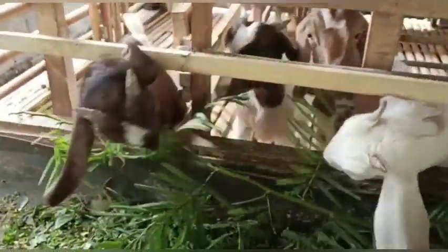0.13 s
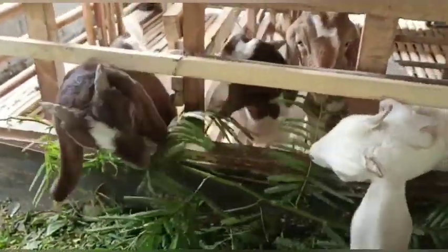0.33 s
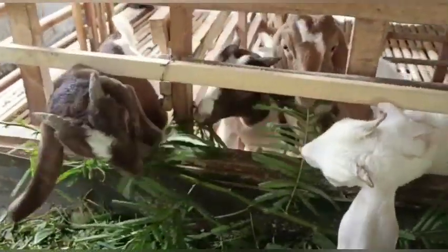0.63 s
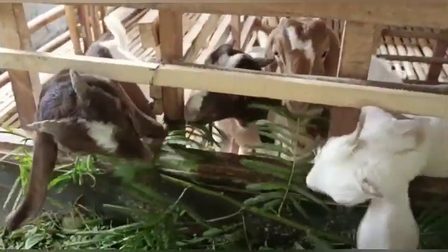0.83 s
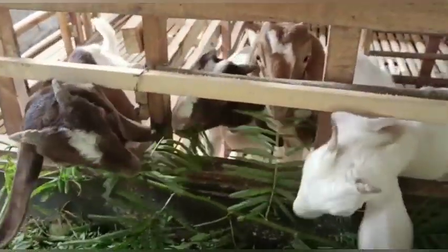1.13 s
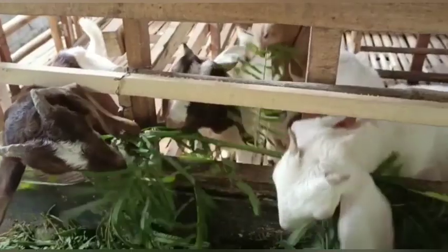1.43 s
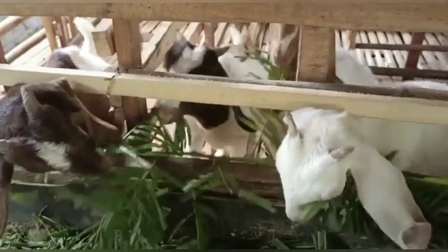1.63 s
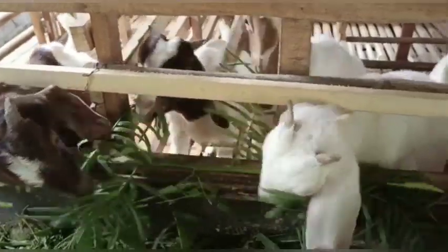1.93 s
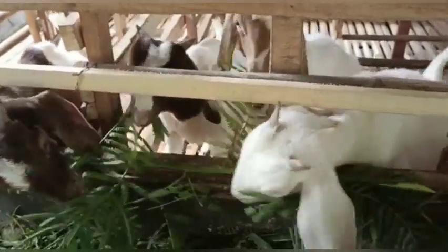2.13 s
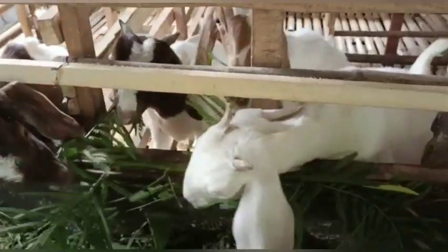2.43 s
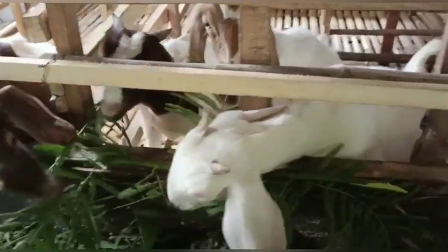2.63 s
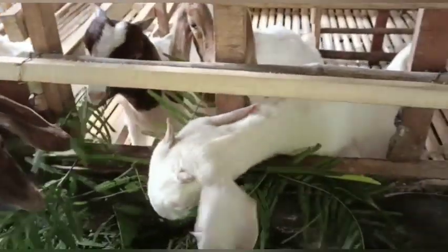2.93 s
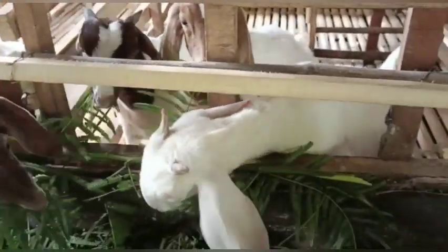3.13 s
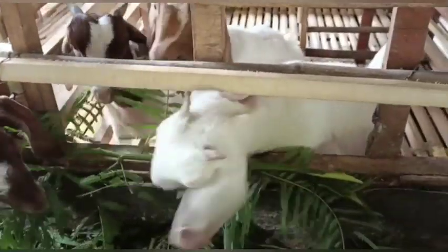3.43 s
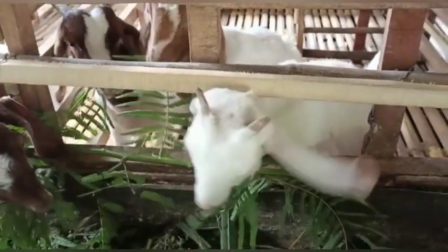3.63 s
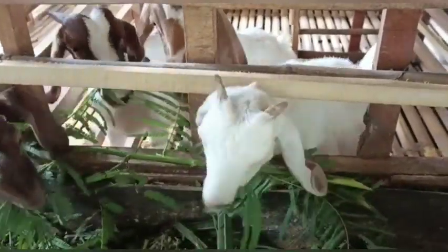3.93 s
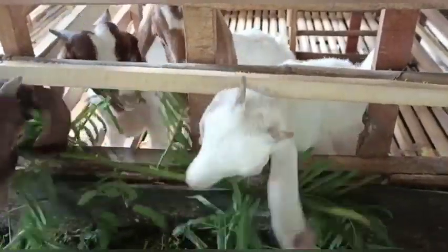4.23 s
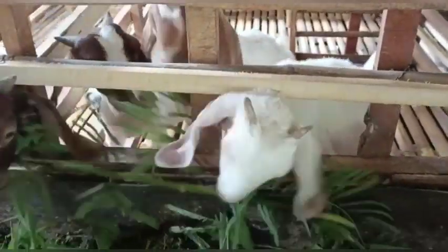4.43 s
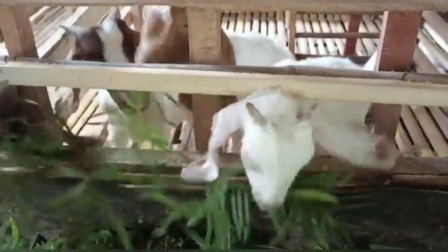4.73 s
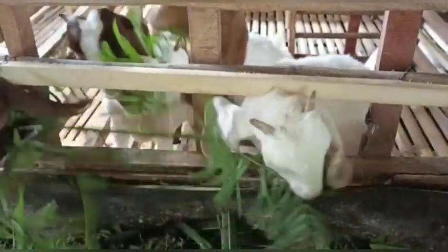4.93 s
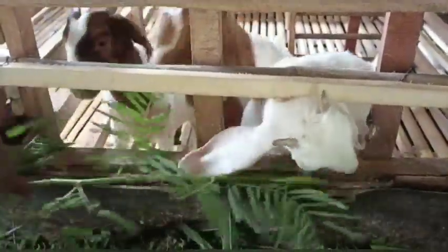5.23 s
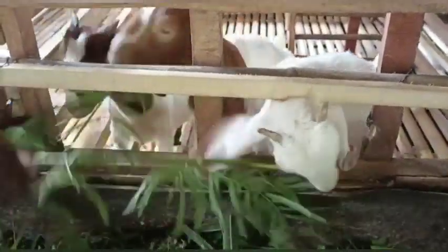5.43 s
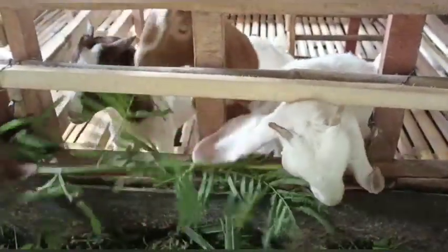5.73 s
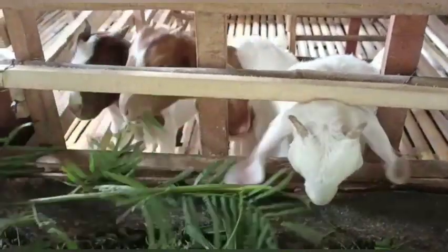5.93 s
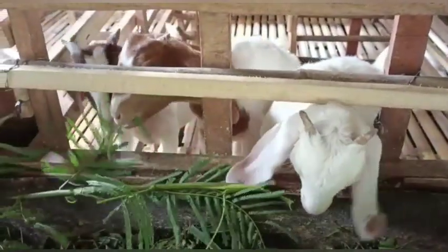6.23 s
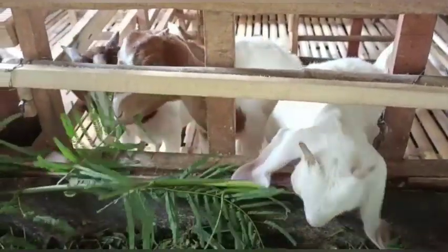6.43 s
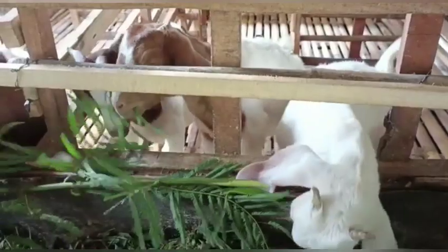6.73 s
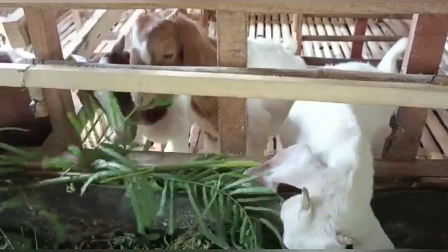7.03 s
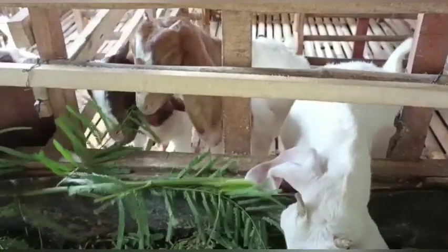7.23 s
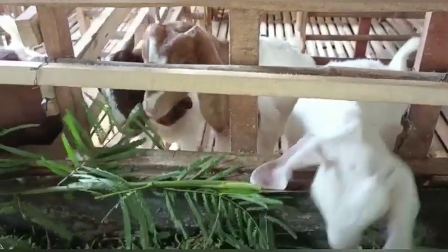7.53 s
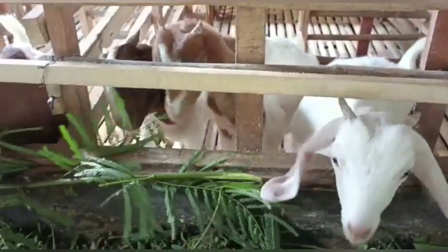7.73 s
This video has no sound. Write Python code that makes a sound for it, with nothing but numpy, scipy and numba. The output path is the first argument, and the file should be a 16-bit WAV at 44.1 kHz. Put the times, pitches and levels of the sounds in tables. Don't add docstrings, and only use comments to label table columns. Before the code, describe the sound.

Overlapping nasal, raspy goose calls run almost without pause while hooves thump hollow slats and wood ticks sharply in a farm pen.

```python
import sys
import numpy as np
from scipy import signal
from scipy.fft import rfft, irfft
from scipy.io import wavfile
from scipy.ndimage import uniform_filter1d
from numba import njit

SR = 44100
rng = np.random.default_rng(int(sys.argv[2]) if len(sys.argv) > 2 else 0)


def dump(signal):
    limited = np.clip(np.atleast_2d(signal).T, -1, 1)
    pcm = np.round(limited * 32767).astype(np.int16)
    wavfile.write(sys.argv[1], SR, pcm)


def field_ratio(decibels):
    return 10 ** (np.asarray(decibels, dtype=float) / 20)


N = 347067
TIME = np.arange(N) / SR
FREQ = np.arange(N // 2 + 1) * SR / N


def unit(x):
    return x / np.sqrt(np.mean(x ** 2))


def noise(*shape):
    return rng.standard_normal(shape)


def colour(x, points):
    hz, db = np.transpose(points)
    return irfft(rfft(x) * field_ratio(np.interp(np.log(FREQ + 1), np.log(hz), db)), N)


def lift(x, peaks):
    db = sum(d / (1 + (2 * (FREQ - f) / w) ** 2) for f, w, d in peaks)
    return irfft(rfft(x) * field_ratio(db), N)


def band(x, lo_hz, hi_hz):
    return signal.sosfilt(signal.butter(4, [lo_hz, hi_hz], "band", fs=SR, output="sos"), x)


def walk(rate):
    k = int(SR / rate)
    steps = np.repeat(noise(N // k + 1), k)
    return 1.3 * uniform_filter1d(uniform_filter1d(steps, k), k)[:N]


def place(x, pan_db, lead_s):
    late = irfft(rfft(x) * np.exp(-2j * np.pi * FREQ * lead_s), N)
    return np.array([x * field_ratio(pan_db / 2), late * field_ratio(-pan_db / 2)])


def fade(start_s, t60):
    return np.exp(-np.log(1000) * np.clip(TIME - start_s, 0, None) / t60)


def ring(start_s, hz, t60, rise_s):
    t = np.clip(TIME - start_s, 0, None)
    return np.sin(2 * np.pi * hz * t) * (1 - np.exp(-t / rise_s)) * fade(start_s, t60)


@njit
def svf(x, hz, width):
    y, b, l = np.empty(len(x)), 0., 0.
    for i in range(len(x)):
        g, k = np.tan(np.pi * hz[i] / SR), width / hz[i]
        v = (b + g * (x[i] - l)) / (1 + g * (g + k))
        b, l, y[i] = 2 * v - b, l + 2 * g * v, k * v
    return y


def swells(s, hold_s, db, rise_db_s, fall_db_s):
    t, start, end = TIME[::64], np.c_[s], np.c_[s + np.abs(hold_s)]
    rise = rise_db_s * np.clip(start - t, 0, 1)
    fall = fall_db_s * np.clip(t - end, 0, 1)
    return field_ratio(2 * (np.c_[db] - rise - fall))


def total_db(power, rest_db):
    return np.interp(TIME, TIME[::64], 10 * np.log10(power.sum(0) + field_ratio(2 * rest_db)))


def loudest(power, values):
    return np.interp(TIME, TIME[::64], np.dot(values, power) / power.sum(0))


# (full voice at [s], hold [s], effort [dB], bill rasp [dB], chest [dB])
HONKS = [(0.024, 0.0042, -58.0, 4.5, -2.5), (0.196, 0.076, -41.0, -20.5, -24.5),
         (0.797, 0.11, -38.0, -18.5, -26), (1.182, 0.021, -37.5, -12.0, -4),
         (1.432, 0.12, -39.0, -14, -17.5), (2.089, 0.13, -39.5, -13.5, -15.5),
         (2.764, 0.13, -38.0, -16.5, -19), (3.639, 0.13, -41.0, -14.0, -13.5),
         (3.81, 0.054, -36.0, -14.0, -12.5), (4.298, 0.15, -43.0, -12, -29),
         (4.363, 0.23, -39.0, -12.5, -14.5), (4.638, 0.07, -40.0, -20.5, -22.5),
         (4.93, 0.11, -41.0, -14.5, -34), (4.971, 0.26, -40.0, -16, -15), (5.283, 0.011, -52.0, -2, -6),
         (5.581, 0.081, -36.0, -9.5, -16), (5.781, 0.2, -41.5, -18, -16.0),
         (6.123, 0.15, -43.0, -18.5, -22), (6.201, 0.1, -38.0, -10, -16.5),
         (6.588, 0.21, -39.5, -19, -23.5), (6.82, 0.078, -36.5, -10.5, -21.5),
         (7.337, 0.042, -42.5, -17.0, -25), (7.4, 0.16, -35.5, -16, -23)]
# (full voice at [s], hold [s], effort [dB], chest [dB], mouth resonance [Hz])
CLUCKS = [(0.2, 0.02, -46.0, -26.0, 1100.0), (0.341, 0.096, -49.0, -18, 1302),
          (0.502, 0.052, -49.0, -7.0, 1210), (0.638, 0.132, -47.0, -22.5, 1274),
          (1.0, 0.1, -49.0, -15, 1220), (1.729, 0.12, -70.0, 3, 1220), (1.851, 0.037, -45.0, -10, 1180),
          (2.31, 0.011, -57.0, -40, 1220), (2.421, 0.0022, -38.5, -22, 1346.0),
          (2.64, 0.0039, -40.0, -14, 1425), (3.054, 0.13, -62.0, -8.5, 1427),
          (3.201, 0.062, -43.0, -29, 1360), (3.361, 0.07, -41.0, -35, 1560), (3.54, 0.032, -57.0, -1, 1400),
          (3.998, 0.079, -43.0, -21, 1680), (5.43, 0.14, -43.0, -37, 1590),
          (6.451, 0.014, -59.0, -15, 1520), (6.99, 0.024, -55.5, -42, 1740),
          (7.173, 0.045, -51.0, -17.5, 1120), (7.61, 0.063, -47, -15.5, 1240)]
# (time [s], hold [s], level [dB])
HISSES = [(1.1, 0.024, -54), (1.93, 0.083, -65.5), (3.07, 0.039, -65), (3.267, 0.062, -59),
          (3.548, .05, -61), (4.03, 0.036, -61), (0.495, 0.032, -74), (7.635, .06, -70.5)]
HONK_MOUTH_HZ, CLUCK_RASP_DB = 1311, -28
CALL_RISE_DB_S, CALL_FALL_DB_S, MURMUR_DB = 450, 300, -76
RASP_STEEPNESS, CHEST_STEEPNESS = 0.94, 0.8


def calls():
    honks, clucks = np.transpose(HONKS), np.transpose(CLUCKS)
    s, hold_s, db = np.concatenate([honks[:3], clucks[:3]], axis=1)
    rasp_db = np.r_[honks[3], CLUCK_RASP_DB + 0 * clucks[3]]
    chest_db = np.r_[honks[4], clucks[3]]
    mouth_hz = np.r_[HONK_MOUTH_HZ + 0 * honks[3], clucks[4]]

    def layer(level_db, steep):
        return swells(s, hold_s, level_db, steep * CALL_RISE_DB_S, steep * CALL_FALL_DB_S)

    voice = layer(db, 0.99)
    hisses = swells(*np.transpose(HISSES), CALL_RISE_DB_S, CALL_FALL_DB_S)
    rasp = np.r_[layer(db + rasp_db, RASP_STEEPNESS), hisses]
    chest = layer(db + chest_db, CHEST_STEEPNESS)
    return (total_db(voice, MURMUR_DB), total_db(rasp, MURMUR_DB - 7.0),
            total_db(chest, MURMUR_DB - 10.5), loudest(voice, mouth_hz))


@njit
def pulses(hz, stretch, size):
    out, phase, p, k = np.zeros(len(hz) + 1), np.empty(len(hz)), 0., 0
    for i in range(len(hz)):
        step = hz[i] * stretch[k] / SR
        p += step
        if p >= 1:
            p, k = p - 1, k + 1
            out[i] += size[k] * p / step
            out[i + 1] += size[k] * (1 - p / step)
        phase[i] = p
    return out[:-1], phase


JITTER, SHIMMER_DB, BREATH_DB = .028, 4, 0


def goose(hz, pan_db, lead_s):
    chance = noise(N // 60, 2).T
    slaps, phase = pulses(hz, 1 + JITTER * chance[0], field_ratio(SHIMMER_DB * chance[1]))
    puff = np.exp(-phase / 0.5) * noise(2, N)
    slaps = place(unit(slaps - slaps.mean()), pan_db, lead_s)
    return field_ratio(1.1 * walk(30)) * (slaps + field_ratio(BREATH_DB) * unit(puff))


PEN_T60_S, PEN_DB = 0.13, 1


def pen(dry):
    t = TIME[:SR // 4]
    scatter = noise(2, len(t)) * np.exp(-np.log(1000) * t / PEN_T60_S)
    scatter /= np.sqrt(np.sum(scatter ** 2, axis=1, keepdims=True))
    return dry + field_ratio(PEN_DB) * signal.fftconvolve(dry[::-1], scatter, axes=1)[:, :N]


# (pitch [Hz], level [dB], left minus right [dB], left lead [s])
BIRDS = [(411.7, -1.5, 1.5, .0002), (313.4, -2, 1.5, -0.0081), (397.5, -2.5, -2.5, -0.0041)]
# (frequency [Hz], level [dB per Hz])
THROAT = [(260, -75.5), (450, -0.5), (588, -9.5), (719, -5), (805, -11), (1050, -2), (1200, -9),
          (1380, -3.5), (1610, -5.5), (2350, -7.5), (3840, -4.5), (5030, -11.5), (6500, -35.5),
          (8450, -86.5), (14300, -120)]
# (frequency [Hz], width [Hz], lift [dB])
WINDPIPE = [(820, 40, 2.5), (1225, 50, 6.5), (1580, 90, 2), (1880, 40, 1), (3810, 200, 3), (5150, 350, -9),
            (5600, 300, 2)]
SAG_PER_DB, WANDER = .003, .03
MOUTH_SAG_PER_DB, MOUTH_WIDTH_HZ = .0025, 596.0


def flock():
    effort_db, rasp_db, chest_db, mouth_hz = uniform_filter1d(calls(), size=900)
    sag = 1 + SAG_PER_DB * np.clip(effort_db + 40, -25, 5)
    mouth_hz = mouth_hz * (1 + MOUTH_SAG_PER_DB * np.clip(effort_db + 46.5, -25, 10))
    voices = 0
    for hz, db, pan_db, lead_s in BIRDS:
        level = field_ratio(db + 3.7 * walk(5))
        voices = voices + level * goose(hz * sag * (1 + WANDER * walk(6)), pan_db, lead_s)
    voices /= np.sqrt(uniform_filter1d(np.mean(voices ** 2, 0), SR // 12))
    throat = lift(colour(voices, THROAT), WINDPIPE)

    def mouth(x):
        return svf(svf(x, mouth_hz, MOUTH_WIDTH_HZ), mouth_hz, MOUTH_WIDTH_HZ)

    broad = unit(band(throat, 932, 1996))
    narrow = unit(np.array([mouth(x) for x in broad]))
    opening = np.clip((effort_db + 60.5) / 25, .08, .9)
    honk = np.sqrt(opening) * broad + np.sqrt(1 - opening) * narrow
    rasp = field_ratio(rasp_db + 1.2 * walk(14) - 4.5) * unit(band(throat, 1710, 8900))
    chest = field_ratio(chest_db - 3.5) * unit(band(throat, 531, 894))
    return pen(field_ratio(effort_db - 5.5) * honk + rasp + chest)


# (time [s], peak [dB], plank [Hz], t60 [s], upper modes [dB])
KNOCKS = [(0.498, -53, 300.5, 0.13, -20), (0.859, -59, 228.7, 0.53, -19), (1.05, -47, 169.7, 0.1, -1),
          (1.171, -36.5, 282, 0.12, 1), (1.514, -40, 243, 0.18, -5), (2.744, -51, 182.9, 0.36, -20),
          (2.88, -46.5, 145, 0.2, 1.5), (2.909, -48, 352, 0.18, -2.5), (3.116, -55.5, 228.6, 0.36, -40),
          (3.346, -31.5, 184.1, 0.17, -17), (3.383, -33.5, 161.4, 0.25, -22.5),
          (3.549, -46.5, 375, 0.3, -2), (3.883, -33.5, 291.5, 0.3, -14), (4.285, -49, 297.1, 0.17, -8),
          (4.595, -43.5, 251.9, 0.35, -14), (4.993, -40.5, 285.7, 0.22, -24), (5.619, -56, 406.3, 0.19, 7),
          (5.786, -38, 170.2, 0.15, -10.5), (6.291, -41, 213.3, 0.38, -15.5),
          (7.38, -53, 219.9, 0.24, -17.5), (7.488, -55, 257.7, 0.21, -19)]
# (frequency ratio [1], level [dB])
PLANK = [(1, 5), (.62, -3), (0.87, 1.5), (1.47, -6.5)]
# (frequency [Hz], level [dB])
PLANK_TOP = [(500, 5.5), (600, 6.5), (700, 6), (780, 0)]


def knocks():
    out, rattle = 0, unit(band(noise(2, N), 130, 650))
    for (s, db, hz, t60, top_db), spread in zip(KNOCKS, noise(len(KNOCKS), 4)):
        t60 = max(t60, .03)
        low = sum(field_ratio(d) * ring(s, hz * r, t60, 0.0037) for r, d in PLANK)
        top = 0
        for (f, d), e in zip(PLANK_TOP, spread):
            top = top + field_ratio(d) * ring(s, f * (1 + 0.046 * e), 0.77 * t60, 0.0033)
        loose = (TIME >= s) * fade(s, t60) * rattle
        out = out + field_ratio(db - 5.0) * (low + field_ratio(top_db + 1.0) * top + field_ratio(-7.0) * loose)
    return band(out, 30, 1020)


# (time [s], hold [s], level [dB], pitch [Hz])
BOOMS = [(0.537, 0.085, -63, 86.0), (1.049, 0.003, -57.5, 93.05), (1.193, 0.0018, -69, 89.0),
         (1.548, 0.1284, -49, 90.0), (2.185, 0.0077, -48.5, 90.2), (2.406, 0.001, -61, 85.93),
         (2.743, 0.012, -71, 90.1), (2.887, 0.0074, -59.5, 100.8), (3.145, 0.162, -79.0, 84.9),
         (3.365, 0.27, -53.5, 94.5), (3.574, 0.0234, -47.5, 96.4), (3.81, 0.00033, -47.5, 73.84),
         (3.928, 0.03, -49, 86.04), (4.076, 0.11, -57.5, 81.87), (4.387, 0.12, -56, 86.48),
         (4.562, 0.067, -54.5, 82.93), (4.859, 0.034, -60, 89.78), (5.003, 0.012, -46.5, 86.53),
         (5.15, 0.13, -63.5, 86.36), (5.399, 0.4, -77.5, 92.3), (5.575, 0.19, -62.5, 83.22),
         (5.789, 0.16, -62.5, 94.6), (6.344, 0.063, -50, 92.16), (6.502, 0.158, -66.5, 85.8),
         (6.845, 0.21, -74, 83.55), (7.162, 0.146, -66.5, 79.7), (7.346, 0.15, -64, 82.5),
         (7.593, 0.16, -64.5, 83.64)]
# (time [s], hold [s], level [dB])
SHUFFLES = [(0.203, .05, -76), (0.64, 0.048, -73), (1.628, 0.048, -81), (1.733, .02, -61),
            (2.202, 0.024, -57), (2.44, 0.031, -77), (3.59, 0.045, -52), (3.811, 0.043, -40),
            (3.961, 0.013, -42), (4.58, 0.079, -55), (5.3, 0.029, -66.5), (5.772, 0.061, -48),
            (7.185, 0.064, -71.5)]
BOOM_RISE_DB_S, BOOM_FALL_DB_S, BOOM_REST_DB = 501.5, 212.5, -84.5
SHUFFLE_RISE_DB_S, SHUFFLE_FALL_DB_S, SHUFFLE_REST_DB = 1101, 248.5, -72.5
SCUFF_DB, SCUFF_S, SCUFF_LAG_S = -9, 0.029, 0.019


def frame():
    s, hold_s, db, hz = np.transpose(BOOMS)
    steps = swells(s, hold_s, db, BOOM_RISE_DB_S, BOOM_FALL_DB_S)
    boom_db, boom_hz = total_db(steps, BOOM_REST_DB), loudest(steps, hz)
    scuffs = [(knock[0] + SCUFF_LAG_S, SCUFF_S, knock[1] + SCUFF_DB) for knock in KNOCKS]
    rubs = np.transpose(list(SHUFFLES) + scuffs)
    shuffle_db = total_db(swells(*rubs, SHUFFLE_RISE_DB_S, SHUFFLE_FALL_DB_S), SHUFFLE_REST_DB)
    hum = np.sin(2 * np.pi * np.cumsum(boom_hz) / SR)
    boom = hum + 0.38 * unit(svf(noise(N), boom_hz, 27.0))
    mid, side = (field_ratio(6.1 * walk(29)) * band(noise(N), 115, 372) for _ in range(2))
    low = field_ratio(boom_db - 0.7) * unit(boom) + field_ratio(shuffle_db - 2.5) * unit(mid)
    return low + field_ratio(shuffle_db - 15.0) * unit(side) * np.array([[1], [-1]])


# (time [s], peak [dB], ring [Hz], treble [dB])
TICKS = [(0.7704, -54, 1170, -39), (0.8087, -31.5, 1540, -33), (1.1057, -29.5, 1580, -49),
         (1.1791, -18.5, 1232, -53), (1.5227, -28, 1350, -38), (1.8554, -43, 1208, -47),
         (2.1536, -25.5, 1730, -19.5), (3.619, -28, 1208, -12.5), (3.8, -32, 1517, -44),
         (4.3019, -34, 1260, -14.5), (4.3289, -33, 1199, -8), (4.5551, -26.5, 1559, -54),
         (4.7378, -38.5, 1230, -8), (4.975, -29, 1736, -45), (5.793, -26, 1350, -45),
         (7.4003, -31, 1229, -51)]


def ticks():
    rings, dull, crisp, hiss = 0, 0, 0, noise(N)
    for s, db, hz, treble_db in TICKS:
        crack = field_ratio(db) * (TIME >= s) * np.exp(-np.clip(TIME - s, 0, 1) / 0.0032) * hiss
        rings = rings + field_ratio(db) * ring(s, hz, .022, .0003)
        dull = dull + crack
        crisp = crisp + field_ratio(treble_db) * crack
    body = field_ratio(-1.5) * band(rings, 600, 5000)
    body += field_ratio(4) * band(dull, 800, 1900) + field_ratio(-5) * band(dull, 1900, 4200)
    near = place(body, -.7, .0002)
    treble = field_ratio(-14) * band(crisp, 6500, 12500) + field_ratio(-4) * band(crisp, 2200, 6000)
    treble += field_ratio(-20) * band(crisp, 12500, 15800)
    return (near + pen(near)) / 2 + treble


# (time [s], hold [s], rustle [dB], crispness [dB])
TUGS = [(0.056, 0.077, -74.5, -14.5), (0.479, 0.0096, -81, -40.0), (1.121, 0.06, -62, -14),
        (1.168, 0.024, -62.5, -3), (1.295, 0.063, -75, -9), (1.494, 0.002, -64, -18.0),
        (1.702, 0.003, -77.5, -9), (1.975, 0.03, -74, -20.0), (2.173, 0.003, -64.5, -21),
        (2.687, 0.14, -80, -21.0), (3.15, 0.006, -68, -33), (3.298, 0.0065, -75, -14),
        (3.626, 0.003, -70, -28), (3.751, 0.016, -71, -15), (4.065, 0.032, -71.5, -19),
        (4.312, 0.064, -66, -14), (4.585, 0.032, -63, -9), (4.741, 0.012, -71, -15),
        (4.951, 0.19, -73.5, -23), (5.28, 0.067, -67, -11), (5.408, 0.034, -72, -22),
        (5.599, 0.2, -70, -17.0), (5.753, 0.055, -74.0, -16), (6.001, 0.097, -77, -20.0),
        (6.55, 0.124, -74, -22), (6.877, 0.083, -79, -28), (7.275, 0.089, -71.5, -41.5),
        (7.748, 0.393, -85, -21.0)]
TUG_RISE_DB_S, TUG_FALL_DB_S, RUSTLE_REST_DB, CRISP_REST_DB = 298, 221.5, -81, -96
CRISP_PAN_DB = 8


def leaves():
    s, hold_s, db, crisp_db = np.transpose(TUGS)
    rustle_db = total_db(swells(s, hold_s, db, TUG_RISE_DB_S, TUG_FALL_DB_S), RUSTLE_REST_DB)
    crisp_db = total_db(swells(s, hold_s, db + crisp_db, TUG_RISE_DB_S, TUG_FALL_DB_S), CRISP_REST_DB)
    snap_db = 3 * rng.exponential(size=N // 40 + 1).repeat(40)[:N]
    snaps = noise(2, N) * field_ratio(snap_db)
    body, crisp = unit(band(snaps, 6900, 10920)), unit(band(snaps, 12140, 15700))
    pan_db = CRISP_PAN_DB * np.array([[.5], [-.5]])
    rustle = field_ratio(rustle_db + 2.3 * walk(7.8) - 10.0) * body
    return rustle + field_ratio(crisp_db + 2.2 * walk(11) - 1.2 + pan_db) * crisp


# (time [s], length [s], from [Hz], to [Hz])
CHIRP = (.466, .1, 3600, 2450)
CHIRP_DB = -54


def chirp():
    start_s, length_s, from_hz, to_hz = CHIRP
    part = np.clip((TIME - start_s) / length_s, 0, 1)
    hz = from_hz * (to_hz / from_hz) ** part
    whistle = unit(svf(svf(noise(N), hz, 450.), hz, 450.))
    level = field_ratio(CHIRP_DB - 14 * part + 3 * walk(40)) * (part > 0) * (part < 1)
    return place(level * whistle, -8, -.0002)


# (frequency [Hz], level [dB per Hz])
YARD = [(15, -57), (25, -16), (103, -8), (444, -17), (879, -19.5), (1220, -6), (1590, -6.5), (2200, -22.5),
        (3790, -25), (7000, -74.5), (9100, -106), (15400, -120)]
YARD_DB = -66


def yard():
    murmur = unit(colour(noise(2, N), YARD))
    edges = 25 * 2 ** np.arange(0, 8.6, .5)
    flutter = sum(field_ratio(5.5 * walk(12)) * band(murmur, lo, hi) for lo, hi in zip(edges, edges[1:]))
    return field_ratio(YARD_DB - 2.5) * flutter


def scene():
    return flock() + chirp() + knocks() + frame() + ticks() + leaves() + yard()


HUSH_SHARPNESS, HUSH_PATCH_DB, HUSH_TRIM_DB = .36, 2.8, -2


def hush(x):
    spec = signal.stft(x, nperseg=1024, noverlap=768)[2]
    held = uniform_filter1d(np.abs(spec) ** 2, size=9, axis=2) + 1e-20
    gain = (held / uniform_filter1d(held, size=25, axis=1)) ** HUSH_SHARPNESS
    patches = uniform_filter1d(noise(*spec.shape[1:]), size=7, axis=0)
    patches = uniform_filter1d(patches, size=14, axis=1)
    gain *= field_ratio(HUSH_TRIM_DB + HUSH_PATCH_DB * unit(patches))
    above_bass = np.clip(np.arange(spec.shape[1]) / 30, .25, 1)[:, None]
    return signal.istft(spec * gain ** above_bass, nperseg=1024, noverlap=768)[1][:, :N]


def low_pass(x):
    return signal.sosfilt(signal.butter(12, 15890, fs=SR, output="sos"), x)


# (frequency [Hz], width [Hz], lift [dB])
PORTS = [(10080, 1330, 15.5), (8125, 1660, 15.5)]


def record(dry):
    ports = np.array([lift(x, [port]) for x, port in zip(dry, PORTS)])
    mix = hush(ports)
    return low_pass(mix)


dry = scene()
out = record(dry)
dump(out)
```